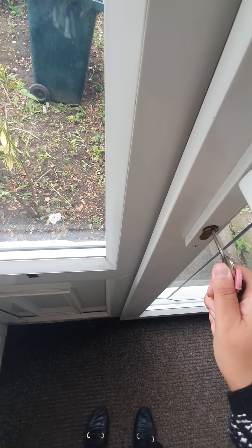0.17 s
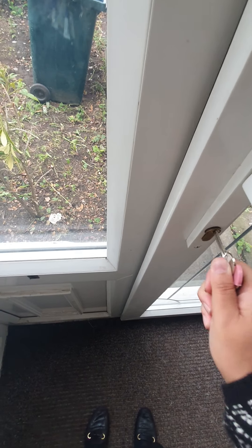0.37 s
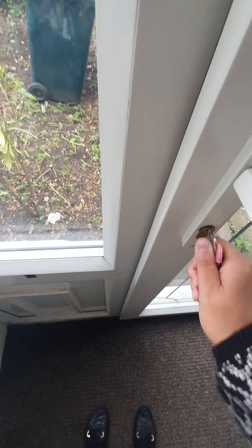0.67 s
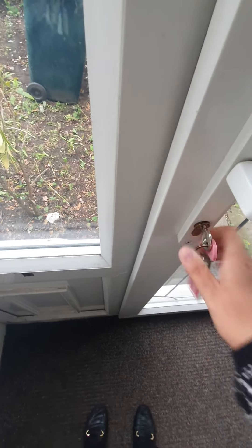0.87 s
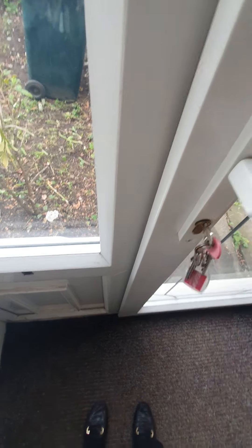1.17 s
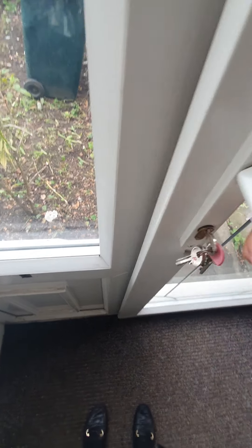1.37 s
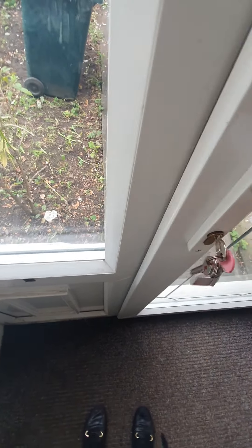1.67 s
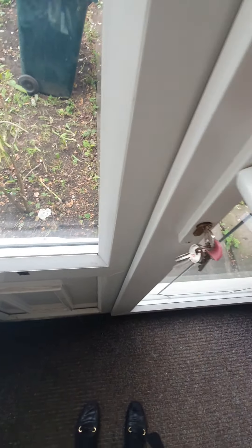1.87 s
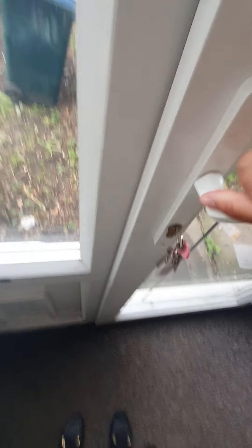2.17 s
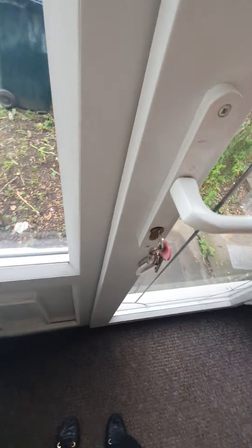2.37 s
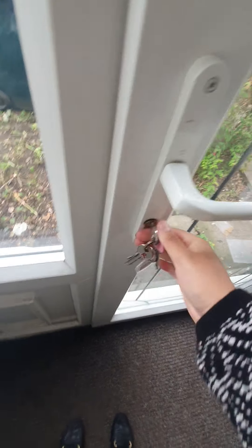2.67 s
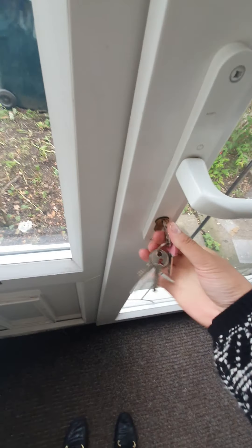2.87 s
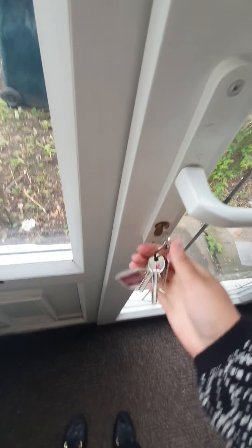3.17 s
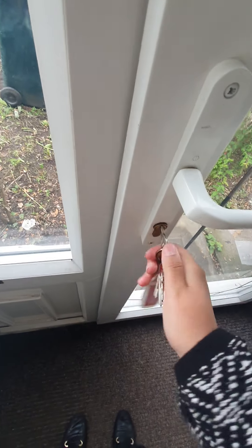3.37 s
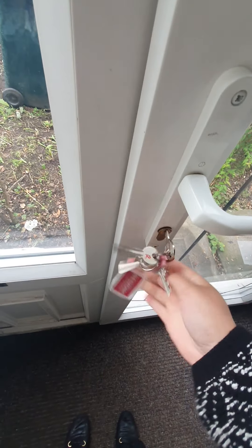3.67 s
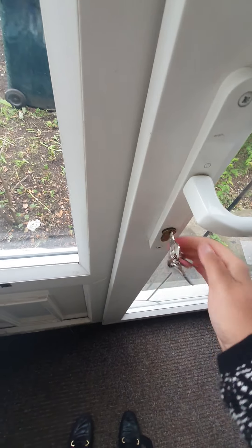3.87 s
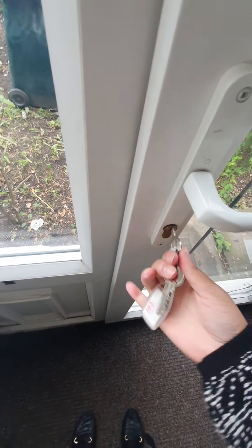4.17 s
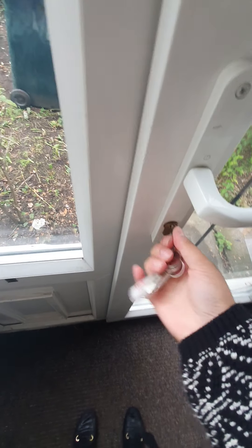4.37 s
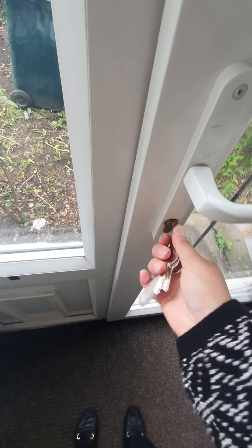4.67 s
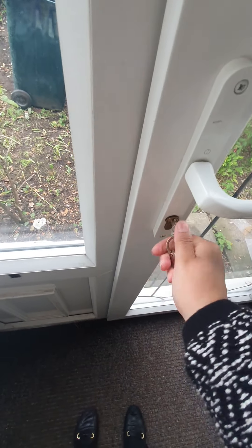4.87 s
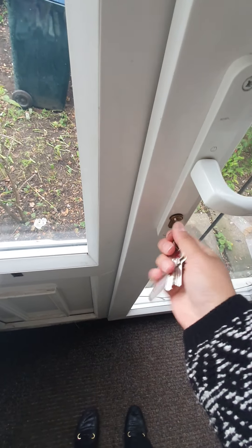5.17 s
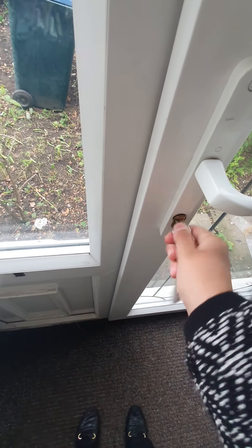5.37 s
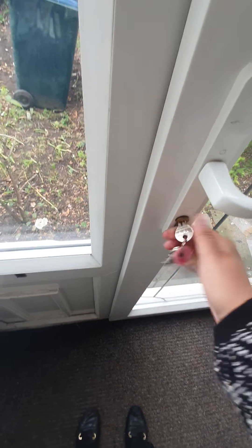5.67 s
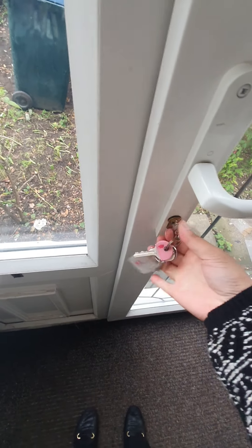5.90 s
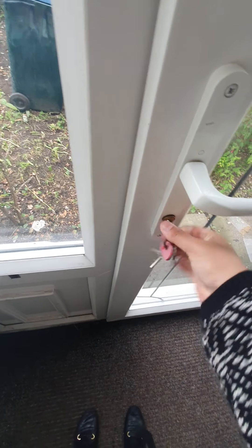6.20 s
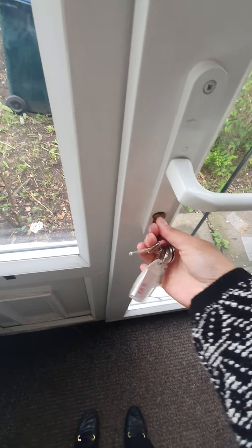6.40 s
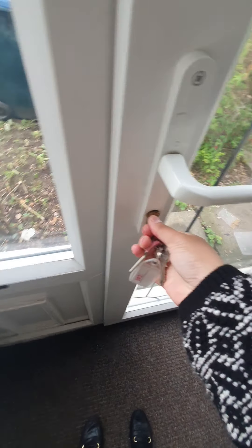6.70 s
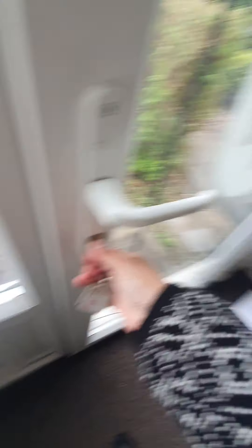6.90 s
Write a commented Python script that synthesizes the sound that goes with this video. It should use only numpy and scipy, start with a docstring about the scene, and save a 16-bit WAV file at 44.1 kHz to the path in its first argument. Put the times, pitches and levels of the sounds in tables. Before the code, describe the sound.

Close handheld stereo pickup of a door being locked and unlocked indoors. Small metal clicks and a key scrape lead to dull door bumps, a double clack and a solid handle clunk. Light, glittering keys shake around the middle, quieten in the hand, snap with a turn of the lock, then jingle again before the door seal creaks. Short room reflections, low rumble and faint sleeve rustle.

```python
"""Faint touches of keys and clicks of a lock come first, then a plastic door thuds against its frame in a small hall.
The handle throws the bolts, the keys swing and jingle, the key is turned and the lock snaps over.
Near the end come a close dry tap and the creak of the door in its seal.
Bursts of noise and dying tones make the hits and keys, random clicks the sliding and jingle.
Struck low tones make the thuds, a train of slips the creak, coloured noise the rumble and rustle."""
import sys
import numpy as np
from scipy import signal
from scipy.fft import rfft, irfft, next_fast_len
from scipy.io import wavfile

SR = 44100
rng = np.random.default_rng(int(sys.argv[2]) if len(sys.argv) > 2 else 0)


def file_out(sig):
    """Save sig as 16-bit WAV at sys.argv[1]."""
    # one column per channel
    cols = np.atleast_2d(sig).T
    # limit, then scale
    lim = np.clip(cols, -1, 1)
    pcm = np.round(lim * 32767).astype(np.int16)
    wavfile.write(sys.argv[1], SR, pcm)


N = 310464
TIME = np.arange(N) / SR  # s
BAND_HZ = np.geomspace(170, 15000, 16)  # middles of the noise bands
BAND_STEP = np.sqrt(BAND_HZ[1] / BAND_HZ[0])  # from the middle of a band to its edge, as a ratio

# The door panel bumps in its frame. Each row: start in seconds, relative level in dB.
THUDS = [(0.417, -27.5), (0.603, -17), (0.723, -16.5), (0.897, -15), (1.255, -19.5), (1.333, -17.5),
         (1.502, -8.5), (1.573, -27.5), (1.799, -23.5), (1.975, -26), (2.318, -22.5), (4.219, -31),
         (5.172, -37.5)]
# Ringing tones of the keys. Each row: pitch in Hz, relative level in dB, typical time to fall 60 dB in seconds.
KEY_MODES = [(2960, -19.5, 0.092), (3470, -27, .08), (3980, -20, 0.13), (4470, -3.5, .08),
             (5200, -18, 0.067), (5600, -19, 0.087), (6100, -6.5, 0.15), (7000, -9, 0.1), (10000, -10, .09),
             (11160, -4, .15), (11900, -6, 0.1), (11300, -3.5, 0.074), (11950, -10, 0.3),
             (12900, -4.5, .08), (13010, -3, 0.096), (13700, -8.5, .08), (14320, 1.5, 0.13),
             (14900, -4.5, .06), (15600, -17, .07)]
# Ringing tones of the key ring and fobs. Each row: pitch in Hz, relative level in dB,
# typical time to fall 60 dB in seconds.
FOB_MODES = [(2010, 2.5, 0.027), (2785, -6.5, 0.031), (3880, -6.5, 0.15), (4740, -3.5, 0.02),
             (6230, 12, 0.017)]
# Resonances of the frame and lock case. Each row: pitch in Hz, width in Hz, relative gain in dB.
FRAME_MODES = [(248, 8.2, -16.5), (296.6, 12, 2), (420.5, 36, 4.5), (568, 7.7, -1), (797, 140, -5),
               (1340, 17, -35), (1890, 360, -1.5), (3870, 42, 0)]
# Colour of a key touch. Each row: frequency in Hz, relative level in dB.
CLINK_COLOUR = [(170, -30.5), (700, -26), (1500, -19), (2600, -11.5), (4000, -9.5), (6300, -11),
                (8200, -11.5), (11500, -5), (15000, -12)]


def amp(db):
    """Turn decibels into a gain."""
    return 10 ** (np.asarray(db) / 20)


def unit(x):
    """Scale to an rms of 1."""
    return x / np.sqrt(np.mean(x ** 2) + 1e-20)


def at_hz(points, hz):
    """Read a curve between its points, on a log-frequency axis."""
    point_hz, value = np.transpose(points)
    return np.interp(np.log(np.maximum(hz, 1)), np.log(point_hz), value)


def level(curve, column=1):
    """Turn one dB column into a gain over time; silent outside the curve."""
    points = np.array(curve)
    return amp(np.interp(TIME, points[:, 0], points[:, column], left=-200, right=-200))


def pan(db):
    """Left and right gains for a level difference; plus is to the left."""
    return amp([[db / 2], [-db / 2]])


def add(out, s, sound):
    """Mix in a sound at a time in seconds."""
    i = int(np.clip(round(s * SR), 0, N - 1))
    out[..., i:i + sound.shape[-1]] += sound[..., :N - i]


def pair(two, alike):
    """Blend two unrelated signals into a left and right that are partly alike."""
    c = np.clip(alike, -1, 1)
    shared = np.sqrt(1 + c) * two[0]
    opposed = np.sqrt(1 - c) * two[1] * np.array([[1], [-1]])
    return (shared + opposed) / np.sqrt(2)


def right_late(x, lag_s=0.00013):
    """Door-borne sound reaches the right side a little later."""
    return np.array([x[0], np.interp(TIME - lag_s, TIME, x[1])])


def bass_together(x, below_hz=330):
    """Long waves reach both sides alike, so the left-right difference loses its bass."""
    mid, side = (x[0] + x[1]) / 2, (x[0] - x[1]) / 2
    side = signal.sosfilt(signal.butter(1, below_hz, "high", fs=SR, output="sos"), side)
    return np.array([mid + side, mid - side])


def coloured(x, spectrum):
    """Give a steady signal a spectrum and an rms of 1."""
    size = next_fast_len(N)
    gains = amp(at_hz(spectrum, np.fft.rfftfreq(size, 1 / SR)))
    return unit(irfft(rfft(x, size) * gains, size)[..., :N])


def noise_bank(alike, size=32768, shared_below_hz=380):
    """Stereo noise in adjoining bands, each of rms 1; long waves reach both sides alike."""
    bands = []
    for hz in BAND_HZ:
        band_alike = alike + (1 - alike) * np.exp(-(hz / shared_below_hz) ** 2)
        white = pair(rng.standard_normal((2, size)), band_alike)
        edges = [hz / BAND_STEP, hz * BAND_STEP]
        bands.append(unit(signal.sosfilt(signal.butter(2, edges, "band", fs=SR, output="sos"), white)))
    return np.array(bands)


def dying(t60, size):
    """Fading curves, one for each time to fall 60 dB."""
    return amp(-60 * np.arange(size) / SR / np.reshape(t60, (-1, 1)))


def burst(bank, band_db, envelope, place):
    """Countless close modes sound together: a stretch of banded noise shaped in time."""
    size = envelope.shape[-1]
    i = int(place * (bank.shape[-1] - size))
    return np.einsum("bct,bt->ct", bank[..., i:i + size], amp(band_db)[:, None] * envelope)


def ring(clicks, hz, t60):
    """A click of size 1 starts a dying sine of height about 1."""
    r, w = amp(-60 / (t60 * SR)), 2 * np.pi * hz / SR
    return signal.lfilter([0, np.sin(w)], [1, -2 * r * np.cos(w), r * r], clicks + 1e-18)


def resonate(x, modes):
    """Resonances side by side, each strongest near its own pitch."""
    out = 0
    for hz, width, db in modes:
        r = np.exp(-np.pi * width / SR)
        feedback = [1, -2 * r * np.cos(2 * np.pi * hz / SR), r * r]
        out = out + amp(db) * (1 - r * r) / 2 * signal.lfilter([1, 0, -1], feedback, x + 1e-18)
    return out


def grains(per_s, spread_db):
    """Random clicks of uneven size, scaled to an rms of 1."""
    sizes = amp(spread_db * np.minimum(rng.exponential(1, N), 3)) * rng.choice([-1, 1], N)
    return unit(sizes * (rng.random(N) < per_s / SR))


def gesture(start, length, attack_s, t60):
    """A movement grows, holds and dies away."""
    attack = np.clip((TIME - start) / attack_s, 0, 1)
    return attack * amp(-60 * np.clip((TIME - start - length) / t60, 0, 3))


def chime(modes, uneven_db, detune, size=8000):
    """Each touch meets another spot, so pitch, damping and mode strengths vary; energy 1 a side."""
    hz, db, t60 = np.transpose(modes)
    shift, damp, strength, *sides = rng.standard_normal((7, len(hz)))
    turn = np.float32(2 * np.pi * (hz * (1 + detune * shift))[:, None] * TIME[:size])
    fade = np.exp(np.float32(-np.log(1000) * TIME[:size] / (t60 * amp(damp))[:, None]))
    weights = np.array(sides) * amp(db + uneven_db * strength)
    out = weights[:2] @ (np.sin(turn) * fade) + weights[2:] @ (np.cos(turn) * fade)
    return out / np.sqrt(np.sum(out ** 2, axis=1, keepdims=True))


def chatter(rise_s, rough_db, size):
    """Loose parts take a moment to meet fully and rattle as they do."""
    knots = rng.standard_normal(size // 64 + 2)  # one random level every 64 samples
    flutter = np.interp(np.arange(size) / 64, np.arange(len(knots)), knots)
    settling = np.exp(-TIME[:size] / 0.024)
    return (1 - np.exp(-TIME[:size] / rise_s)) * amp(rough_db * flutter * settling)


def bearing(s):
    """Left-right dB of the lock: to the left until the listener turns away."""
    # Where the lock lies. Each row: time in seconds, left-right difference in dB.
    turning = [(6.55, 3.5), (6.87, -5)]
    return np.interp(s, *np.transpose(turning))


def background(shudder_db=-4, rustle_db=-2, shudder_top_hz=300):
    """Noise makes the low shudder of the door, stirred by each bump, and a rustle of sleeve and fingers."""
    # Colour of the shudder. Each row: frequency in Hz, relative level in dB.
    shudder_colour = [(13, -32.5), (22, -13), (48, 6.5), (70, -1.5), (103, 6.5), (115, 6.5), (136, -11),
                      (184, 1), (216, -25.5), (236, -14), (324, -11), (407, -11.5), (450, -14),
                      (580, -44.5), (990, -120)]
    # Colour of the rustle. Each row: frequency in Hz, relative level in dB.
    rustle_colour = [(100, -21), (200, -7.5), (450, -1), (1000, -8.5), (2500, -16.5), (6000, -32),
                     (16000, -35.5)]
    # Strength of the rustle. Each row: time in seconds, relative level in dB.
    rustle_curve = [(0.0, -67), (0.45, -51.5), (0.78, -44.5), (1.33, -56.5), (2.6, -61.5), (3.37, -61),
                    (3.75, -47), (4.5, -80), (5.4, -55), (6.3, -51.5), (6.7, -72), (7.04, -41.5)]
    rest_db, kick_db, kick_t60_s = -47, -3, 0.43  # rumble at rest; what each bump adds
    low = coloured(pair(rng.standard_normal((2, N)), alike=0.99), shudder_colour)
    low = signal.sosfilt(signal.butter(2, [28, shudder_top_hz], "band", fs=SR, output="sos"), low)
    high = coloured(pair(rng.standard_normal((2, N)), alike=0.39), rustle_colour)
    shudder = amp(rest_db) + sum(amp(db + kick_db) * gesture(s, 0, 0.0051, kick_t60_s) for s, db in THUDS)
    return amp(shudder_db) * shudder * right_late(low) + amp(rustle_db) * level(rustle_curve) * high


def hall(x, wet_db=-5, gap_s=.005):
    """Dense reflections from near walls are a tail of noise, its highest treble dying first."""
    # How long the hall rings. Each row: frequency in Hz, time to fall 60 dB in seconds.
    hall_t60 = [(200, 0.35), (500, 0.36), (1200, 0.33), (3000, .27), (7000, 0.22), (15000, 0.099)]
    # Colour of the hall. Each row: frequency in Hz, relative level in dB.
    hall_colour = [(200, -1.5), (600, 5), (2000, -1), (6000, -1.5), (9000, -2), (15000, 4)]
    colour = at_hz(hall_colour, BAND_HZ) + 10 * np.log10(BAND_HZ)  # higher bands are wider
    tail = burst(noise_bank(alike=0.13), colour, dying(at_hz(hall_t60, BAND_HZ), size=22000), .5)
    tail = tail / np.sqrt(np.sum(tail ** 2) / 2)
    out = np.zeros((2, N))
    add(out, gap_s, signal.oaconvolve(x, tail, axes=1)[:, :N])
    return amp(wet_db) * out


def tap(start_s=6.8012, tap_db=-17, dull_hz=2600, boom_hz=84, boom_t60=0.059, boom_db=-7, pan_db=-24.5):
    """A dry tap close by, far to the right: a click rings dully, with a brief boom."""
    click = np.zeros(N)
    add(click, start_s, amp([tap_db]))
    treble_cut = signal.butter(4, dull_hz, fs=SR, output="sos")
    knock = signal.sosfilt(treble_cut, ring(click, 1500, 0.0014) + ring(click, 490, 0.0036))
    return (knock + amp(boom_db) * ring(click, boom_hz, boom_t60)) * pan(pan_db)


def creak(gain_db=9, uneven_db=2):
    """The seal sticks and lets go in a train of slips, which mostly slows as the door is pulled."""
    # The slips of the seal. Each row: time in seconds, slips per second, relative level in dB.
    slip_curve = [(6.905, 110, -31), (6.948, 89, -19), (6.992, 77, -19.5), (7.04, 85, -18.5)]
    # Resonances of the creak. Each row: pitch in Hz, width in Hz, relative gain in dB.
    creak_modes = [(200, 290, 1), (650, 1400, -6), (1590, 290, -5), (2800, 460, -14), (3880, 900, -24)]
    s, per_s, _ = np.transpose(slip_curve)
    rate = np.interp(TIME, s, per_s) * (TIME > s[0])
    slips = np.diff(np.floor(np.cumsum(rate) / SR), prepend=0)  # one click at each whole count
    slips = slips * amp(uneven_db * rng.standard_normal(N)) * level(slip_curve, column=2)
    return amp(gain_db) * resonate(slips, creak_modes) * pan(-9.5)


def panel(push_s=0.0081, rebound_s=0.0192, rebound_db=-0.5):
    """The rubber seal softens each bump to a short push, which rings the low modes; the panel bumps back once."""
    # Low ringing tones of the panel. Each row: pitch in Hz, relative level in dB, time to fall 60 dB in seconds.
    panel_modes = [(51, -9, 0.13), (84.4, -4.5, 0.19), (101.8, 0.5, .16), (98.04, -13.5, 0.56),
                   (171.1, -10.5, 0.56), (192.3, -10.5, 0.17)]
    pushes, t = np.zeros(N), np.arange(SR // 20) / SR
    push = t * np.exp(-t * 2 * np.pi / push_s)
    push = push / push.sum()
    for s, db in THUDS:
        add(pushes, s, amp(db) * push)
        add(pushes, s + rebound_s, amp(db + rebound_db) * push)
    # a panel radiates little below its lowest mode
    pushes = signal.sosfilt(signal.butter(2, 42, "high", fs=SR, output="sos"), pushes)
    return sum(amp(db) * ring(pushes, hz, t60) for hz, db, t60 in panel_modes) * pan(1.0)


def swing(t):
    """Vigour of the swinging bunch: each swing builds up and dies down."""
    # The swings. Each row: time of its height in seconds, rise in seconds, fall in seconds, relative level in dB.
    swings = [(0.92, 0.14, .22, -29), (2.65, 0.029, 0.17, -40), (3.14, 0.17, .11, -36.5),
              (3.714, 0.17, 0.37, -27.5), (6.43, 0.21, 0.11, -33)]
    depth_db = 22.5  # gained over one rise time, lost over one fall time
    vigour = 0
    for s, rise, fall, db in swings:
        vigour = vigour + amp(db - depth_db * np.maximum((s - t) / rise, (t - s) / fall))
    return vigour


def stirring(per_s=45, spread_db=13.5, gain_db=-8):
    """Keys held in the hand stir faintly: tiny random touches."""
    # The hand holds the bunch. Each row: start in seconds, length in seconds, relative level in dB.
    grips = [(0.153, 0.19, -74.5), (2.954, 0.47, -57), (4.022, 0.31, -52), (4.424, 0.64, -50.5),
             (5.58, 0.29, -45)]
    strength = sum(amp(db) * gesture(s, length, 0.0091, .1) for s, length, db in grips)
    return amp(gain_db) * grains(per_s, spread_db) * strength


def jingle(per_s, tick_db, ring_db, fob_db, count):
    """The shaken bunch makes many small touches, dealt at random to keys that differ a little in pitch."""
    bank, out = noise_bank(alike=0.15), np.zeros((2, N))
    touches = grains(per_s, 3.8) * swing(TIME) + stirring()
    dealt = rng.integers(0, count, N)
    for k in range(count):
        tick = burst(bank, at_hz(CLINK_COLOUR, BAND_HZ), dying(0.0089, size=800), rng.random())
        key = amp(ring_db) * chime(KEY_MODES, uneven_db=3.5, detune=.009)
        add(key, 0, amp(fob_db) * chime(FOB_MODES, uneven_db=3.5, detune=.08, size=3000))
        add(key, 0, amp(tick_db) * tick / np.sqrt(np.sum(tick ** 2) / 2))
        for i in np.flatnonzero(touches * (dealt == k)):
            add(out, i / SR, touches[i] * key)
    return out


def key_touches(offset_db=-2, scatter_db=2.0, count=3):
    """Another key grazes just ahead of each clink, then the key falls back twice, softer each time."""
    # Key against key or ring. Each row: start in seconds, relative level in dB, relative level under 7 kHz in dB.
    clinks = [(0.108, -59, -55.5), (0.181, -54, -60), (0.272, -57, -56), (0.499, -32, -38),
              (0.578, -52, -62), (0.635, -27.5, -28), (0.878, -17.5, -38), (0.887, -20, -36),
              (0.927, -17, -27), (0.984, -9.5, -27.5), (1.078, -20, -49), (1.694, -30.5, -33.5),
              (1.745, -35, -35), (2.162, -47, -55), (2.294, -18.5, -21.5), (2.415, -34.5, -56.5),
              (2.639, -25, -55), (2.679, -29, -48), (2.815, -23.5, -30.5), (2.959, -41, -47),
              (3.017, -32, -35.5), (3.043, -25.5, -33), (3.141, -19, -32.5), (3.223, -37, -41.5),
              (3.294, -36, -48), (3.431, -35.5, -35.5), (3.503, -22, -49), (3.54, -25.5, -37.5),
              (3.613, -22, -32), (3.641, -20, -38), (3.687, -9, -27), (3.79, -14.5, -34),
              (3.866, -19.5, -26.5), (3.904, -17, -49), (3.969, -12.5, -26.5), (4.074, -34.5, -48),
              (4.142, -33, -43.5), (4.196, -26, -26.5), (4.228, -32, -37), (4.345, -44, -44),
              (4.441, -54, -51.5), (4.538, -42, -46.5), (4.673, -39, -49), (4.788, -31, -41),
              (4.955, -45.5, -51), (5.036, -34, -35), (5.175, -10.5, -23), (5.632, -36, -50.5),
              (5.68, -39.5, -49), (5.734, -35.5, -34), (5.769, -42.5, -33.5), (5.85, -16, -34),
              (5.869, -16, -26.5), (5.899, -19.5, -28.5), (5.958, -36, -28), (6.016, -17, -23.5),
              (6.104, -23, -31.5), (6.173, -24, -36.5), (6.181, -18.5, -30.5), (6.222, -25.5, -32.5),
              (6.263, -20, -30), (6.322, -14, -28), (6.37, -16.5, -21.5), (6.449, -13, -22.5),
              (6.489, -21.5, -23), (6.786, -38.5, -36), (6.876, -33.5, -33.5)]
    graze_s, graze_loss_db = 0.0086, 13  # typical lead of the graze; how much softer it is
    rebound_s, rebound_loss_db = .014, 9.5  # typical gap to a rebound; loss at each
    gripped_ring_db, swing_ring_db = -14.5, 16.5  # ringing in the hand; its rise in the fullest swing
    rows, fullest = [], swing(TIME).max()
    for s, db, under_db in clinks:
        ring_db = gripped_ring_db + swing_ring_db * np.sqrt(swing(s) / fullest)
        run = [(s - graze_s * (.5 + rng.random()), graze_loss_db)]
        for k in range(count):
            run.append((s, k * rebound_loss_db))
            s = s + rebound_s * (.5 + rng.random())
        for at, loss_db in run:
            pan_db = bearing(at) + offset_db + scatter_db * rng.standard_normal()
            rows.append((at, db - loss_db, under_db - loss_db, ring_db, pan_db))
    return rows


def fobs(touches, gain_db=14, detune=.08):
    """Ring and fobs answer each touch with a few short notes that shift with the grip."""
    out = np.zeros((2, N))
    for s, _, under_db, _, pan_db in touches:
        notes = chime(FOB_MODES, uneven_db=7.5, detune=detune, size=3000)
        add(out, s, pan(pan_db / 2) * amp(under_db + gain_db) * notes)
    return out


def keys(tick_t60=0.016, tick_db=-2, low_db=2, modes_db=16, rise_s=0.00032, rough_db=2.0,
         onset_s=0.0016, onset_db=-20, tint_db=4, bounce_s=.005, bounce_db=-7):
    """Each touch is a tick with a soft onset, and a bounce, coloured by gripped keys, while free keys ring on."""
    # Keys and ring damped by the fingers. Each row: pitch in Hz, width in Hz, relative gain in dB.
    gripped_modes = [(2800, 300, -7.5), (3820, 1000, -0.5), (6320, 720, 4.5), (11100, 190, 2),
                     (11670, 840, 1), (12230, 220, 5.5)]
    bank, ticks, rings = noise_bank(alike=0.13), np.zeros((2, N)), np.zeros((2, N))
    tick = dying(tick_t60, size=2400)
    swell = np.exp(-TIME[:900] / onset_s)[None, ::-1]  # the noise onset swells up to the tick
    touches = key_touches()
    for s, db, under_db, ring_db, pan_db in touches:
        colour = at_hz([(5500, under_db + low_db), (9000, db)], BAND_HZ)
        colour = colour + at_hz(CLINK_COLOUR, BAND_HZ) + tick_db
        rattle = tick * chatter(rise_s, rough_db, size=2400)
        rattle *= np.sqrt(np.sum(tick ** 2) / np.sum(rattle ** 2))  # shares out the energy of one touch
        onset = burst(bank, colour + onset_db, swell, rng.random())
        add(ticks, s - swell.size / SR, pan(pan_db) * onset)
        add(ticks, s, pan(pan_db) * burst(bank, colour, rattle, rng.random()))
        # the bounce lands on another spot, with a tint of its own
        tint = tint_db * rng.uniform(-1, 1, len(BAND_HZ))
        bounce = burst(bank, colour + tint + bounce_db, tick, rng.random())
        add(ticks, s + bounce_s * (.5 + rng.random()), pan(pan_db) * bounce)
        tone = chime(KEY_MODES, uneven_db=7, detune=0.014)
        add(rings, s, pan(pan_db / 2) * amp(db + ring_db + modes_db) * tone)
    return ticks + resonate(ticks, gripped_modes) + rings + fobs(touches)


def spring(start_s=2.3, hz=1600, db=-53, t60_s=0.99):
    """The handle is let go and its return spring sings on faintly as one dying tone."""
    flick = np.zeros(N)
    add(flick, start_s, amp([db]))
    return ring(flick, hz, t60_s)


def sliding(body_db=-5, rasp_db=-7, attack_s=0.015, t60_s=.22):
    """The bolt strip drags through its guides in dense little slips that shake the frame."""
    # Lock parts slide and judder. Each row: start in seconds, length in seconds,
    # relative level of the body in dB, relative level of the rasp in dB.
    strokes = [(0.59, .12, -44, -35), (1.194, 0.18, -34.5, -51.5), (1.512, 0.25, -40, -43),
               (1.81, .17, -32, -37), (2.301, 0.077, -25.5, -34), (3.736, 0.037, -64.5, -34),
               (4.158, 0.076, -45, -41.5), (5.781, 0.24, -51, -40)]
    # Colour of the body. Each row: frequency in Hz, relative level in dB.
    slide_low = [(88, -29.5), (150, 4.5), (179, 5), (395, -4.5), (482, -7), (560, -9.5), (1100, -20.5),
                 (1430, -46.5), (2420, -120)]
    # Colour of the rasp. Each row: frequency in Hz, relative level in dB.
    slide_high = [(470, -25.5), (800, 5), (1170, -7), (1920, -2), (4520, -10.5), (6220, -15.5),
                  (7830, -17.5), (11000, -21), (14300, -31), (22000, -120)]
    body = coloured(pair([grains(900, 7.8), grains(830, 3)], alike=1.0), slide_low)
    body = unit(body + resonate(body, FRAME_MODES))
    rasp = coloured(pair([grains(1600, 3.2), grains(1500, 1.6)], alike=.1), slide_high)
    moves = np.array([gesture(s, length, attack_s, t60_s) for s, length, _, _ in strokes])
    shaking, rasping = amp(np.array(strokes)[:, 2:].T) @ moves
    return amp(body_db) * shaking * body + amp(rasp_db) * rasping * rasp * pan(2.5)


def pitched(table, gain_db, spread, count=8):
    """A part rings briefly with a cluster of close modes around one pitch."""
    out = np.zeros((2, N))
    for s, db, hz, t60 in table:
        cluster = chime([(hz, 0, max(t60, .01))] * count, uneven_db=0, detune=spread)
        add(out, s, amp(db + gain_db) * cluster / np.abs(cluster).max())
    return out


def knocks():
    """The bolt knocks in the hollow frame and the fob against the panel."""
    # The knocks. Each row: start in seconds, relative peak in dB, middle pitch in Hz,
    # typical time to fall 60 dB in seconds.
    knock_list = [(0.65, -12.5, 402, 0.16), (1.318, -10.5, 1218, 0.12), (1.905, -35, 282, 0.18),
                  (2.311, -14, 151, 0.17), (2.333, -14, 189.5, 0.19), (3.734, -12, 1234, 0.034),
                  (4.227, -19, 343, 0.13), (4.227, -18.5, 1055, 0.033), (5.457, -25, 486, 0.16),
                  (5.83, -25.5, 457, 0.17), (7.013, -21.5, 467, 0.11)]
    return pitched(knock_list, gain_db=-7.0, spread=.11)


def pings():
    """The key grates over the pins and in the cylinder, with short high rings."""
    # The pings. Each row: start in seconds, relative peak in dB, middle pitch in Hz,
    # typical time to fall 60 dB in seconds (at least 0.01 is used).
    ping_list = [(0.594, -19, 2800, 0.029), (0.889, -15, 2850, 0.023), (0.927, -13.5, 5000, 0.035),
                 (0.978, -9.5, 4380, 0.008), (4.537, -43, 2470, 0.036), (4.673, -43.5, 2660, 0.029),
                 (4.829, -24, 3870, 0.012), (4.952, -42, 2480, 0.016), (5.035, -38.5, 2690, 0.027),
                 (6.016, -13, 4240, 0.011)]
    return pitched(ping_list, gain_db=-1.5, spread=.04, count=5) * pan(7.3)


def lock(crack_t60=0.03, gain_db=4, frame_db=-5, rise_s=0.00039, rough_db=3, steel_db=13, spike_db=4,
         onset_s=0.0032, onset_db=-9, top_loss_db=10, top_follows=0.15):
    """Steel parts hit their stops: a soft onset, a spike, a crack, ringing steel and the hollow door."""
    # Bolts, latch, handle and cylinder hit their stops. Each row: start in seconds, relative level of steel in dB,
    # relative level of door in dB, ring of the door against the crack in dB.
    clacks = [(0.301, -49.5, -46.5, -9), (0.352, -51.5, -61, 4), (0.509, -31.5, -39, -6),
              (0.593, -33, -33, -5), (0.649, -19, -20, -15.5), (0.886, -28.5, -24.5, -12),
              (0.925, -22, -39.5, -7), (0.979, -18, -33, -12.5), (1.135, -35.5, -42.5, -14),
              (1.196, -36, -24.5, -14.5), (1.251, -32.5, -25.5, -17), (1.277, -16.5, -31, -8.5),
              (1.304, -13.5, -21, -16), (1.318, -19, -24.5, -12), (1.498, -32, -33.5, 2),
              (1.625, -42.5, -37, -11), (1.785, -42.5, -38.5, -1.5), (1.844, -22, -28, -5.5),
              (1.877, -33.5, -26.5, -3.5), (1.905, -34.5, -30, 0), (2.213, -69.5, -41, 4),
              (2.297, -15, -17.5, -31), (2.311, -30.5, -17.5, -11.5), (2.333, -40, -35, -23),
              (2.814, -31.5, -77, -8.5), (3.501, -33, -52.5, -11.5), (3.734, -21.5, -34, -8.5),
              (3.788, -30, -48, 1), (4.225, -29.5, -29, -14), (4.828, -36.5, -39.5, -11.5),
              (5.062, -36, -44.5, -2), (5.173, -16.5, -32.5, -4.5), (5.457, -37.5, -39.5, -11),
              (5.581, -45, -49, -1.5), (5.826, -29, -43, -2.5), (5.989, -25.5, -35.5, -14),
              (6.864, -54.5, -35.5, -22)]
    # Colour of a hit. Each row: frequency in Hz, relative level in dB.
    clack_colour = [(170, -10.5), (400, -15.5), (800, -12.5), (1300, -11), (2500, -9), (4000, -8),
                    (6000, -9.5), (8000, -7.5), (12000, -8), (15000, -10.5)]
    # How long the door rings after a hit. Each row: frequency in Hz, time to fall 60 dB in seconds.
    door_t60 = [(200, 0.25), (500, 0.41), (1200, 0.1), (3000, 0.075), (8000, 0.024), (15000, 0.03)]
    # Ringing tones of the steel parts. Each row: pitch in Hz, relative level in dB,
    # typical time to fall 60 dB in seconds.
    steel_modes = [(1975, -3, 0.019), (2364, -8, .025), (2700, -13.5, 0.023), (3870, 5.5, 0.016),
                   (4200, -20.5, 0.0053), (5000, -18, .04), (5750, -6, 0.075), (6810, -1.5, 0.094)]
    bank, out = noise_bank(alike=0.15), np.zeros((2, N))
    crack = dying(crack_t60 * (3000 / BAND_HZ) ** 0.14, size=11000)
    door = dying(at_hz(door_t60, BAND_HZ), size=11000)
    swell = np.exp(-TIME[:900] / onset_s)[None, ::-1]  # a soft noise onset swells just ahead of the hit
    spike = np.diff(ring(signal.unit_impulse(128), 1600, .0009), prepend=0)
    for s, hard_db, door_db, ring_db in clacks:
        # the more steel outweighs door, the brighter the crack
        top_db = hard_db - top_loss_db + top_follows * (hard_db - door_db)
        colour = at_hz([(350, door_db), (4000, hard_db), (11000, top_db)], BAND_HZ)
        colour = colour + at_hz(clack_colour, BAND_HZ) + gain_db
        envelope = (crack + amp(ring_db) * door) * chatter(rise_s, rough_db, size=11000)
        hit = burst(bank, colour, envelope, rng.random())
        add(hit, .001, amp(hard_db + steel_db) * chime(steel_modes, uneven_db=13, detune=0.027))
        add(hit, .002, amp(hard_db + spike_db) * spike / spike.max())
        add(out, s, pan(bearing(s)) * hit)
        onset = burst(bank, colour + onset_db, swell, rng.random())
        add(out, s - swell.size / SR, pan(bearing(s)) * onset)
    return out + amp(frame_db) * resonate(out, FRAME_MODES)


def scene(keys_wet_db=-2, seal_wet_db=-6):
    """Lock, keys and seal sound in the hall; panel, tap and background are added without it."""
    door = right_late(lock() + sliding() + spring(), lag_s=0.00036)
    door = door + knocks() + pings()
    bunch = keys() + jingle(per_s=160, tick_db=-6.5, ring_db=-8, fob_db=-15, count=20)
    seal = creak()
    echoes = hall(door + amp(keys_wet_db) * bunch + amp(seal_wet_db) * seal)
    heard = bass_together(door + bunch + seal + echoes)
    return heard + right_late(panel(), lag_s=0.00019) + tap() + background()


def record(dry, cutoff_hz=16100):
    """The loudest peaks are flattened, then the top is cut."""
    top_cut = signal.ellip(10, .1, 80, cutoff_hz, fs=SR, output="sos")
    return signal.sosfilt(top_cut, np.clip(dry, -.8, .8))


dry = scene()
out = record(dry)
file_out(out)
```